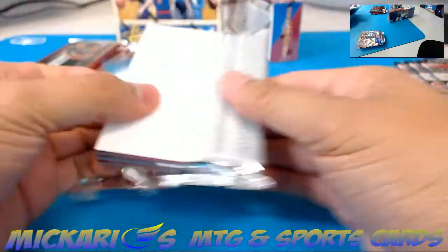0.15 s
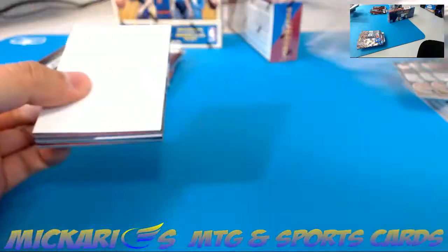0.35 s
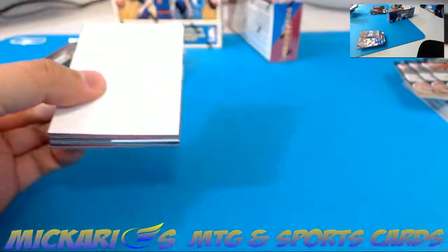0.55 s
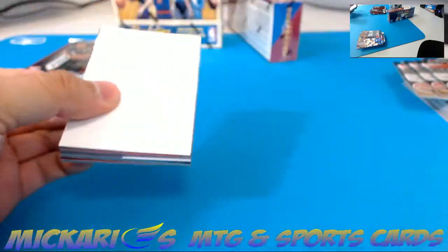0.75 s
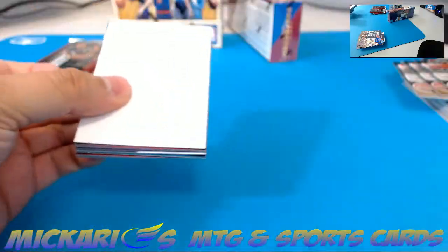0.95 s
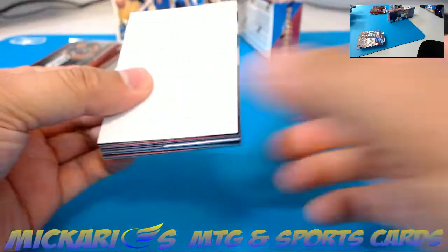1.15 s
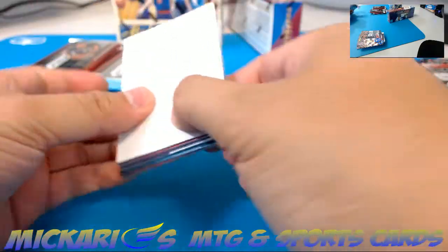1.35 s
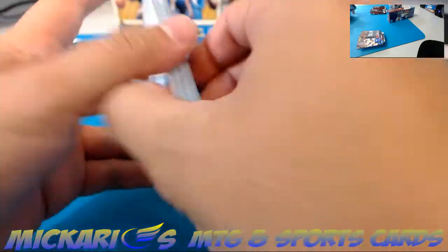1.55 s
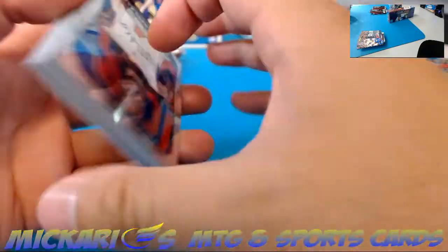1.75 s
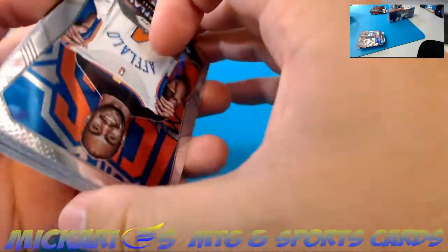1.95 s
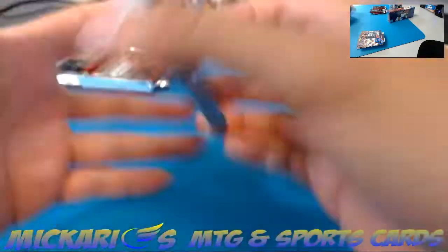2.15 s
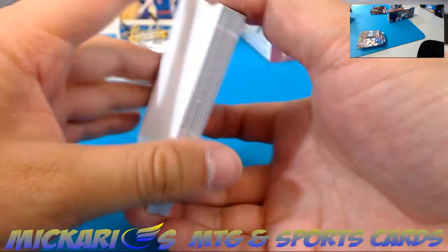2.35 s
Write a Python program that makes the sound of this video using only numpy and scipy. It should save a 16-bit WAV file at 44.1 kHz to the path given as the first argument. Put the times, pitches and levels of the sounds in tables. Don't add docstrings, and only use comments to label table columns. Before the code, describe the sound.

Foil wrapper crackles sharply, close up: brief snaps from 0 to 0.1 s, a loud burst with a thumping microphone-stand knock around 0.2-0.28 s, then another crisp crinkle at 0.53 s. After that, quiet room tone with soft low arm thuds, light card-edge ticks around 1.1-1.2 and 1.5 s, faint finger slides, a short thumb riffle at 2.35 s and a small chink with a thud near 2.45 s.

```python
import sys
import numpy as np
from scipy import signal
from scipy.io import wavfile
from scipy.ndimage import uniform_filter1d

SR = 44100
rng = np.random.default_rng(int(sys.argv[2]) if len(sys.argv) > 2 else 0)


def int16_out(signal):
    q = np.round(np.clip(np.atleast_2d(signal).T, -1, 1) * 32767)
    wavfile.write(sys.argv[1], SR, q.astype(np.int16))


def linear_from_db(decibels):
    return 10 ** (np.asarray(decibels, float) / 20)


N = 110250
LEFT_RIGHT = np.array([[1.], [-1.]])


def evened(x):
    return x / np.sqrt(np.mean(x ** 2) + 1e-20)


def read(points, hz):
    f, value = np.transpose(points)
    return np.interp(np.log(hz + 1), np.log(f + 1), value)


def add(mix, s, sound):
    part = mix[..., round(s * SR):][..., :sound.shape[-1]]
    part += sound[..., :part.shape[-1]]


def resonate(x, hz, width):
    r = np.exp(-np.pi * width / SR)
    return 2 * signal.lfilter([1 - r], [1, -r * np.exp(2j * np.pi * hz / SR)], x).real


def narrow(x, hz, width):
    return resonate(resonate(x, hz, width), hz, width)


def crackle(count):
    grains_per_s, spread_db = 9000, 1.6
    is_grain = rng.random(count) < grains_per_s / SR
    size = linear_from_db(spread_db * np.minimum(rng.exponential(1, count), 4))
    click, hiss = rng.standard_normal((2, count))
    return evened(is_grain * click * size + .15 * hiss)


# (frequency [Hz], density [dB per Hz])
AIR_SPECTRUM = [(40, 7.5), (66, 6), (95, -1.5), (300, -9), (1300, -21), (2500, -27.5), (3200, -33),
                (6500, -36.5), (16000, -42)]
# (frequency [Hz], side minus mid [dB])
AIR_SIDE_LEVEL = [(60, -17.5), (950, -20), (15000, -9)]
# (frequency [Hz], width [Hz], level [dB])
HUM_MODES = [(110, 50, -77.5), (240, 10, -81), (960, 190, -88.5)]


def air():
    level_db, patch_db = -73, 0.97
    frames, hz = N // 256 + 5, np.fft.rfftfreq(1024, 1 / SR)
    a, b, c, d, patch = rng.standard_normal((frames, 513, 5)).T
    patch = uniform_filter1d(patch, size=14, axis=0)
    patch = evened(uniform_filter1d(patch, size=8, axis=1))
    side_gain = linear_from_db(read(AIR_SIDE_LEVEL, hz))[:, None]
    z = np.array([a + 1j * b, (c + 1j * d) * side_gain])
    z *= linear_from_db(read(AIR_SPECTRUM, hz)[:, None] + patch_db * patch)
    mid, side = signal.istft(z, nperseg=1024, noverlap=768)[1][:, :N]
    highpass = signal.butter(2, 80, "high", fs=SR, output="sos")
    scale = linear_from_db(level_db) / np.std(signal.sosfilt(highpass, mid))
    hum = sum(linear_from_db(db) * evened(narrow(rng.standard_normal(N), f, w)) for f, w, db in HUM_MODES)
    return scale * np.array([mid + side, mid - side]) + hum


def slip(length, db, hz, width, rise, fade_db):
    release = .008
    t = np.arange(round(SR * (length + release))) / SR
    grit = crackle(len(t))
    body = evened(narrow(grit, hz, width))
    body = body + .45 * evened(narrow(grit, 1.85 * hz, 1.5 * width))
    body = body + linear_from_db(-15) * grit
    shape = np.minimum(t / rise, 1) * np.clip((length + release - t) / release, 0, 1) ** 2
    return linear_from_db(db + fade_db * t / length) * shape * body


# (start [s], length [s], level [dB], pitch [Hz], width [Hz])
FOIL_STRAIN = (0, .026, -60, 2000, 2200)


def strain(hands):
    add(hands, FOIL_STRAIN[0], slip(*FOIL_STRAIN[1:], rise=0.0055, fade_db=13.5))


# (time [s], length [s], level [dB], pitch [Hz], width [Hz])
FOIL_SLIPS = [(.0265, .026, -44, 2500, 1800), (.0285, .02, -42, 480, 300), (.0653, .021, -50, 1570, 1530),
              (.0715, .014, -56, 4600, 1800), (.0945, .021, -52.5, 1100, 800),
              (.0995, .022, -61, 7400, 900), (.125, .06, -71, 4600, 2490), (.201, .017, -54, 4300, 3500),
              (.2275, .014, -29, 2600, 3500), (.229, .011, -33, 1150, 800), (.2495, .014, -32, 3200, 4000),
              (.2711, .022, -50.5, 2700, 2400), (.33, .035, -70, 2600, 1800),
              (.3685, .012, -57, 2100, 1500), (.376, .009, -56, 2300, 1800), (.386, .014, -67, 2000, 1000),
              (.415, .012, -70, 2200, 2000), (.424, .014, -66, 1800, 1200), (.442, .011, -66, 1300, 1200),
              (.4685, .02, -61, 2400, 700), (.486, .02, -57, 2450, 900), (.486, .022, -62, 4900, 1800),
              (.508, .016, -69, 2500, 3000), (.525, .022, -47, 3700, 3800), (.5265, .022, -45, 340, 260),
              (.527, .017, -41, 1170, 800), (.528, .015, -44, 2130, 900), (.547, .012, -53, 2200, 2500),
              (.558, .018, -63, 2850, 3130), (.59, .016, -72, 3000, 3500), (.6107, .018, -70, 6400, 2800)]


def rustles(hands):
    for s, *row in FOIL_SLIPS:
        add(hands, s, slip(*row, rise=.001, fade_db=-10))


def snap(db, hz, t60=0.045, pan_db=0, share=.36):
    t = np.arange(round(SR * (abs(t60) + 0.0085))) / SR
    drive = (t == 0) * 2 + rng.standard_normal(len(t)) * linear_from_db(-60 * t / 0.0017) * 0.36
    head = narrow(drive, hz, share * hz)
    head = head + .18 * narrow(drive, 1.6 * hz, 0.42 * hz)
    head = head + 0.04 * np.diff(drive, prepend=0)
    grit = crackle(len(t))
    tail = evened(narrow(grit, hz, 0.6045 * hz) + 0.14 * grit) * linear_from_db(-24.5 - 60 * t / t60)
    return linear_from_db(db + LEFT_RIGHT / 2 * pan_db) * (head / abs(head).max() + tail)


# (time [s], peak [dB], pitch [Hz])
FOIL_SNAPS = [(.0282, -21, 1585), (.0292, -20, 2420), (0.0289, -20.5, 3330), (.029, -21, 5400),
              (0.0296, -21.5, 6940), (0.0307, -31, 1020), (.033, -30, 2700), (.041, -40, 3020),
              (0.0641, -35, 1980), (.066, -41.5, 3000), (0.0678, -38, 1500), (0.0738, -44, 4640),
              (0.095, -36, 1400), (0.1015, -45, 1790), (.1885, -36.5, 3460), (.199, -25.5, 4160),
              (0.2283, -15, 4800), (0.2292, -19, 1650), (0.2389, -25, 4977), (.246, -25.5, 1697),
              (.251, -23, 2475), (0.2557, -6, 2083), (.2802, -26.5, 2600), (0.2802, -27.5, 5640),
              (.4065, -67, 6420), (0.415, -61, 4500), (.4435, -61, 2960), (0.4687, -58, 4620),
              (0.5278, -25.5, 790), (.5287, -36.5, 5400), (.5325, -31.5, 2098), (0.5354, -30.5, 1200),
              (0.5402, -36.5, 1514), (0.6084, -49.5, 7800)]


def foil_snaps(hands):
    for s, *row in FOIL_SNAPS:
        add(hands, s, snap(*row))


# (time [s], signed force [1], contact [s])
STAND_KNOCKS = [(.2215, -.04, .003), (.2262, .62, .0024), (.2286, -.2, .0004), (.2303, .47, .0004),
                (.2331, .92, .0004), (.2351, 1.24, .004), (.2353, .36, .0004), (.2403, -.42, .0004),
                (.2489, .72, .002), (.2529, .65, .002), (.2561, -.2, .0004), (.2571, .35, .0004),
                (.2625, .15, .001), (.2805, .02, .002)]
# (frequency [Hz], level [dB], t60 [s])
STAND_MODES = [(105, -22, .03), (190, -6, .025), (300, -1, .018), (480, -3, .014), (760, -10, .008)]


def stand():
    force, t = np.zeros(N), np.arange(6000) / SR
    for s, push, contact in STAND_KNOCKS:
        bump = np.sin(np.pi * np.arange(1 / SR, contact, 1 / SR) / contact) ** 2
        add(force, s, push * bump / bump.sum())
    ring = sum(linear_from_db(db - 60 * t / t60) * np.sin(2 * np.pi * hz * t) for hz, db, t60 in STAND_MODES)
    return 0.93 * signal.oaconvolve(force, ring)[:N]


def thud(db, hz, length):
    t = np.arange(round(SR * 1.5 * length)) / SR
    u = t / t[-1]
    tone = np.sin(2 * np.pi * hz * t * (1 - .05 * u) + 6 * rng.random())
    rough = evened(narrow(rng.standard_normal(len(t)), 0.964 * hz, 1.1 * hz))
    return linear_from_db(db) * np.sin(np.pi * u ** .9) ** 2 * (tone + 0.3 * rough)


# (time [s], level [dB], pitch [Hz], length [s])
ARM_THUDS = [(0.284, -47, 150.4, 0.029), (0.384, -59.5, 240, 0.057), (0.48, -57.5, 114, 0.039),
             (0.535, -39.5, 504, .014), (0.584, -56, 110, 0.061), (0.722, -60, 118, 0.039),
             (1.04, -60, 120, .05), (1.07, -66.5, 350, 0.039), (1.294, -63, 113, .04),
             (1.335, -66, 248, 0.038), (1.474, -57.5, 99.74, 0.036), (1.561, -66.5, 251.7, 0.052),
             (1.701, -57, 99.8, 0.036), (1.8, -59.5, 110, .04), (2.13, -54.5, 106.6, 0.059),
             (2.206, -68, 250, 0.038), (2.349, -64.5, 400.3, 0.019), (2.448, -58, 150, 0.036),
             (2.483, -48, 115, .036), (1.109, -67, 431, 0.029)]


def thuds(table):
    for s, db, hz, length in ARM_THUDS:
        add(table, s - .65 * length, thud(db, hz, length))


# (time [s], peak [dB], pitch [Hz], tail t60 [s], left-right [dB])
CARD_TICKS = [(.368, -41, 2600, .06, -7.5), (.3681, -42, 3800, .05, -8), (0.7211, -50.5, 5970, 0.18, -3.5),
              (1.1245, -47, 7510, .05, -1.5), (1.1658, -55, 4600, .03, -2), (1.1697, -50.5, 3180, .05, 0),
              (1.205, -58, 7000, .03, -2.5), (1.1697, -42, 5220, .05, -3.5), (1.1812, -54, 6800, 0.073, -3),
              (1.2082, -48.5, 7210, 0.058, -1.5), (1.2162, -51.5, 7317, .15, 0),
              (1.482, -61, 5200, .03, -2.5), (1.4905, -53, 5000, .07, -4.5), (1.684, -68.5, 4510, .03, -2),
              (2.025, -57.5, 7050, .09, -1)]


def card_ticks(hands):
    for s, *row in CARD_TICKS:
        add(hands, s, snap(*row, share=.24))


# (time [s], length [s], level [dB], pitch [Hz], width [Hz])
FINGER_STROKES = [(0.717, 0.016, -66.5, 4740, 3050), (0.93, 0.025, -68, 3950, 2460),
                  (1.2034, 0.053, -71.5, 7000, 1700), (1.1696, .022, -68.5, 4200, 2500),
                  (1.1116, .012, -77, 3700, 3000), (1.311, 0.021, -84, 7500, 1500),
                  (1.48, 0.028, -70.5, 3400, 1200), (1.484, 0.026, -68.5, 5700, 1800),
                  (1.638, 0.035, -70.5, 3430, 1200), (1.589, .02, -84, 3100, 1200),
                  (1.854, 0.012, -77.5, 7500, 2100), (1.953, .016, -79.5, 5500, 3006),
                  (2.1237, 0.034, -68.5, 2860, 800), (2.1917, 0.021, -75.5, 2500, 1200),
                  (2.253, .025, -70, 4800, 3004), (2.438, .018, -70.5, 4800, 3000),
                  (0.99, .035, -82, 4600, 3500), (2.45, 0.016, -76.5, 5400, 1500)]


def strokes(hands):
    for s, length, *row in FINGER_STROKES:
        add(hands, s, slip(length, *row, rise=0.32 * length, fade_db=-10.5))


# (frequency [Hz], level [dB], t60 [s])
PART_MODES = [(6316, -0.5, 0.0174), (10220, -8.5, .016), (14100, -9, .014), (5000, -1.5, .006),
              (2200, -8, .005)]


def chink(db):
    t = np.arange(2000) / SR
    ring = sum(linear_from_db(p - 60 * t / t60) * np.sin(2 * np.pi * (hz * t + rng.random()))
               for hz, p, t60 in PART_MODES)
    rattle = 1 + .5 * evened(uniform_filter1d(rng.standard_normal(len(t)), size=30))
    return linear_from_db(db) * np.minimum(t / .0005, 1) * ring * rattle


# (time [s], peak [dB])
PART_CHINKS = [
    (1.5005, -69),
    (1.665, -72),
    (1.735, -73),
    (2.4389, -50.5),
    (2.4402, -50.5),
    (2.447, -67),
    (2.4655, -70),
]


def chinks(hands):
    for s, db in PART_CHINKS:
        add(hands, s, chink(db))


# (start [s], length [s], level [dB], fade [dB])
THUMB_RIFFLE = (2.3435, .069, -52.5, -8)
# (frequency [Hz], width [Hz], level [dB])
EDGE_MODES = [(2700, 750, 0), (3500, 1500, -3.5), (5200, 2000, -9), (7200, 2600, -14)]


def riffle(hands):
    start, length, db, fade_db = THUMB_RIFFLE
    t = np.arange(round(SR * (length + .014))) / SR
    grit = crackle(len(t))
    body = evened(sum(linear_from_db(p) * evened(narrow(grit, f, w)) for f, w, p in EDGE_MODES))
    body = body + 0.22 * np.diff(grit, prepend=0)
    drop_db = 13 * np.clip((t - length) / .004, 0, 1)
    shape = linear_from_db(db + fade_db * t / length - drop_db) * np.minimum(t / 0.001484, 1)
    add(hands, start, shape * body)


def room(x):
    mid_db, side_db, t60 = -21, -23, .08
    taps = np.zeros((2, 8000))
    at = np.arange(100, 7980, 20) + rng.integers(0, 20, (2, 394))
    np.put_along_axis(taps, at, rng.choice([-1., 1.], at.shape), 1)
    taps *= linear_from_db(-60 * np.arange(8000) / SR / t60)
    mid, side = signal.fftconvolve(x[None], taps / np.linalg.norm(taps[0]), axes=1)[:, :N]
    return linear_from_db(mid_db) * mid + linear_from_db(side_db) * side * LEFT_RIGHT


def scene():
    hands, table = np.zeros((2, N)), stand()
    foil_snaps(hands)
    card_ticks(hands)
    chinks(hands)
    rustles(hands)
    strokes(hands)
    strain(hands)
    riffle(hands)
    thuds(table)
    skew = .12 * np.diff(table, prepend=0) * LEFT_RIGHT
    return hands + room(hands.mean(0)) + table + skew + air()


def low_pass(x):
    return signal.sosfilt(signal.butter(12, 16660, fs=SR, output="sos"), x)


# (frequency [Hz], gain [dB])
MIC_RESPONSE = [(40, -34.5), (66, -22), (90, 0), (7000, 3), (8500, -5.5), (16300, -14)]


def record(dry):
    ceiling = np.where(dry > 0, 4.2, 1.6)
    overloaded = ceiling * np.tanh(dry / ceiling)
    log_gain = np.log(linear_from_db(read(MIC_RESPONSE, abs(np.fft.fftfreq(8192, 1 / SR)))))
    taps = np.fft.ifft(np.exp(np.conj(signal.hilbert(log_gain)))).real[:4096]
    taps = taps * np.hanning(8192)[4096:]
    mix = signal.oaconvolve(overloaded, taps[None], axes=1)[:, :N]
    return low_pass(mix)


dry = scene()
out = record(dry)
int16_out(out)
```